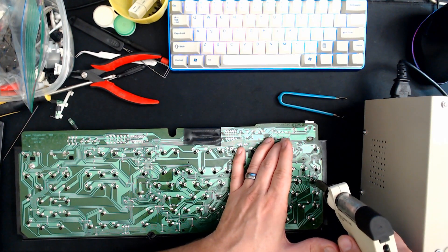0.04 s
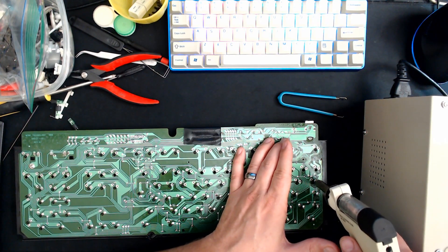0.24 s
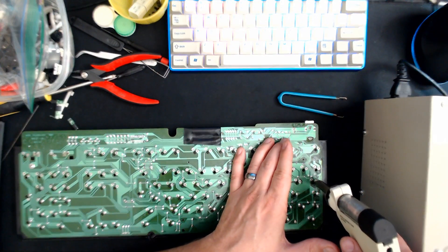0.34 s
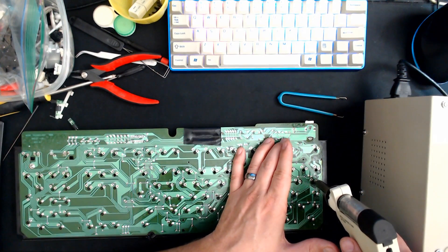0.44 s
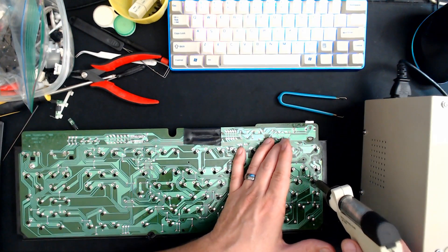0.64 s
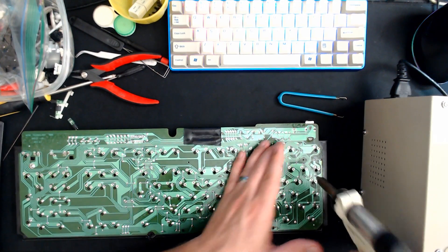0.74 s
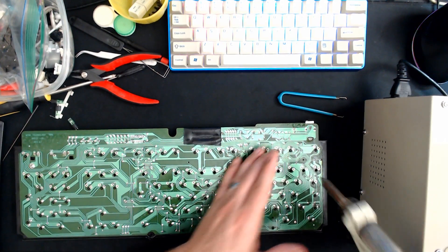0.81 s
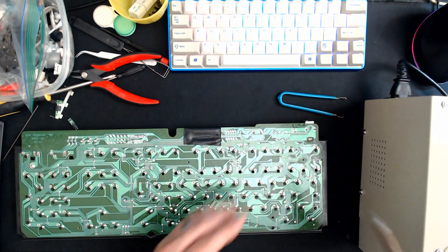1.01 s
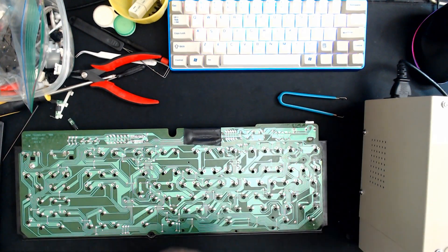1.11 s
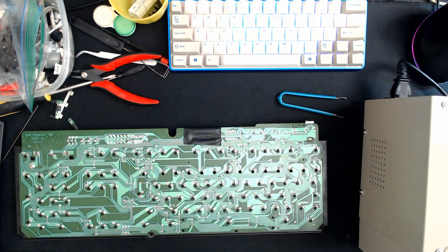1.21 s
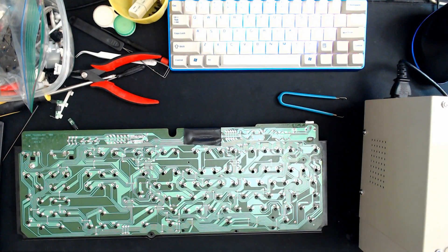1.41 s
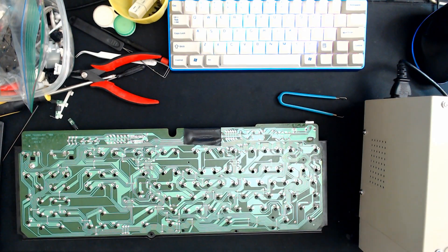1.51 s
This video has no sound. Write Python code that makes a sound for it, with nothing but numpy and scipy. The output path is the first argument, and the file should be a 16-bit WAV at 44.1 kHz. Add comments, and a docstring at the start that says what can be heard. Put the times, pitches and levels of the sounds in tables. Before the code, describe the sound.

A desoldering gun's small vacuum pump buzzes in one short burst, then a fan hums quietly

```python
"""Workbench in a small room: a fan hums throughout. A desoldering gun's trigger clicks and its diaphragm
vacuum pump spins up, runs under half a second and judders to a stop. One shaft phase drives throb partials,
motor whine, casing knocks and pulsed air; solder spits and whistles are noise bursts and rough glides.
Hands then brush off the circuit board, which settles as a few damped modes."""
import sys
import numpy as np
from scipy import signal
from scipy.fft import rfft, irfft, next_fast_len
from scipy.io import wavfile
from scipy.ndimage import map_coordinates

SR = 44100
rng = np.random.default_rng(int(sys.argv[2]) if len(sys.argv) > 2 else 0)


def master_out(mix):
    """Clip the mix to full scale and print it as 16-bit PCM to the path in sys.argv[1]."""
    frames = np.transpose(np.atleast_2d(mix))
    ceiling = np.clip(frames, -1, 1)
    pcm = np.round(ceiling * 32767).astype(np.int16)
    wavfile.write(sys.argv[1], SR, pcm)


N = 68355

# pump shaft: t/s, speed/(turns/s)
SHAFT_SPEED = [(.186, 30), (.2, 46), (.22, 57), (.255, 69), (.335, 78.2), (.4, 80.7), (.48, 82.3),
               (.575, 82.8), (.6, 66), (.645, 35)]
# drive to the casing, for knocks and whine: t/s, level/dB
CASING_DRIVE = [(.175, -110), (.195, -50), (.215, -43), (.245, -38.5), (.29, -42), (.42, -40.5), (.56, -42),
                (.605, -40), (.635, -48.5), (.66, -110)]
# casing resonances: f/Hz, width/Hz, level/dB
CASING_MODES = [(424, 99, -18.5), (634, 38, -12.5), (761.5, 74, -10), (812.6, 28.6, -1), (988, 58.5, 1),
                (1071, 76, -3.5), (1391, 32, -11), (1721, 10, -11.5), (1931.7, 29.4, 0), (2190, 210, -16),
                (2488, 53, -11), (3030, 27, -54), (3550, 65, -54), (3820, 33, -18)]
TOP_HZ = 15800
THROB_ROOM_DB = -17.5
ROOM_DB = -10


def amp(db):
    """Decibels to gain."""
    return 10 ** (np.asarray(db) / 20)


def unit(x):
    """Scale to rms 1."""
    return x / np.sqrt(np.mean(x ** 2) + 1e-20)


def clock():
    """Time of every sample, s."""
    return np.arange(N) / SR


def level(rows):
    """Gain from (t/s, level/dB) points."""
    return amp(np.interp(clock(), *np.transpose(rows)))


def wobble(knots_per_s):
    """Smooth random curve; repeats after 400 knots."""
    return map_coordinates(rng.standard_normal(400), [clock() * knots_per_s], mode="wrap")


def filtered(x, response):
    """x times a response of frequency."""
    m = next_fast_len(N + SR // 2)
    return irfft(rfft(x, m) * response(np.fft.rfftfreq(m, 1 / SR)), m)[:N]


def coloured(x, points):
    """x shaped by (f/Hz, level/dB) points on a log axis."""
    hz, db = np.transpose(points)
    return filtered(x, lambda f: amp(np.interp(np.log(f + 1), np.log(hz), db)))


def gain(body, f):
    """Complex response of a body: a sum of resonances of alternating sign."""
    total = 0
    for k, (centre, width, db) in enumerate(body):
        band = 1j * f * width
        total = total + (-1) ** k * amp(db) * band / (centre * centre - f * f + band)
    return total


def resonate(x, body):
    """x through a body's resonances."""
    return filtered(x, lambda f: gain(body, f))


def fade(start_s, t60_s):
    """Exponential decay from a start time, zero before it."""
    age = clock() - start_s
    return (age >= 0) * np.exp(-np.log(1000) * np.abs(age) / t60_s)


def ring(start_s, modes, scatter_db, attack_s):
    """Struck damped modes; a softer contact has a longer attack time constant."""
    onset = 1 - fade(start_s, np.log(1000) * attack_s)
    total = np.zeros(N)
    for hz, db, t60_s in modes:
        size = amp(db + scatter_db * rng.normal())
        total += size * fade(start_s, t60_s) * np.sin(2 * np.pi * hz * (clock() - start_s))
    return onset * total


def fan():
    """Two hum lines that swell and fade, weaker wavering lines, resonant moving air and room tone."""
    # hum lines: t/s, level/dB rms
    hum_low = [(0, -80), (.08, -84), (.15, -54.5), (.65, -63), (.8, -60.5), (.91, -71), (1.03, -57),
               (1.11, -69), (1.155, -49), (1.2, -69), (1.29, -52), (1.36, -56), (1.55, -56.5)]
    hum_high = [(0, -60.5), (.15, -58.5), (.6, -69), (.9, -65.5), (1.22, -70), (1.35, -63.5), (1.55, -59.5)]
    hum_low_hz, hum_high_hz = 317.2, 365.4
    # weaker lines: f/Hz, mid level/dB rms
    fan_lines = [(100, -79), (270, -75), (414.5, -77), (527.6, -83.5), (1104, -84.5), (1416, -79.5),
                 (2035, -79.5)]
    waver_db, wander_rad = 2.5, .3
    # air resonances: f/Hz, width/Hz, level/dB
    duct = [(271, 77, 0), (1900, 350, -20), (3964, 53, -16.5)]
    # room tone spectrum: f/Hz, level/dB
    room_tone = [(12, -34), (20, -30), (45, -5.5), (70, -30), (101, -16), (187, -57), (233, -10.5),
                 (284, -6), (317, -4), (397, -21.5), (524, -24), (570, -27), (1080, -24.5), (1560, -28.5),
                 (2060, -23), (2500, -33.5), (15800, -56)]
    duct_db, room_tone_db = -67, -59.5

    def tone(hz):
        phase = 2 * np.pi * (hz * clock() + rng.random())
        return np.sqrt(2) * np.sin(phase + wander_rad * wobble(12.45))

    hum = level(hum_low) * tone(hum_low_hz) + level(hum_high) * tone(hum_high_hz)
    lines = sum(amp(db + waver_db * wobble(14.26)) * tone(hz) for hz, db in fan_lines)
    air = amp(duct_db) * unit(resonate(rng.standard_normal(N), duct))
    return hum + lines + air + amp(room_tone_db) * unit(coloured(rng.standard_normal(N), room_tone))


def clicks():
    """Trigger, solder and board clicks: tilted noise cracks; the trigger also rings the gun."""
    # cracks: t/s, level/dB, tilt/(dB/octave)
    cracks = [(.1667, -37, -2), (0.446, -37, -8.5), (0.489, -41.5, -0.5), (0.5749, -33, -5.5),
              (0.584, -38, -13), (.605, -37, -10), (0.628, -37.5, -4), (.641, -42, -17), (.69, -52.5, -7),
              (0.862, -53.5, -4)]
    # gun modes: f/Hz, level/dB, t60/s
    gun = [(4320, -2, 0.021), (4940, -3, 0.012), (7150, 0, 0.02), (10760, -2, 0.014), (13420, -4, .02)]
    trigger_s, trigger_db = .1667, -47
    crack_t60_s, low_hz = 0.0098, 2220
    out = amp(trigger_db) * ring(trigger_s, gun, scatter_db=2.5, attack_s=0.00018)
    for s, db, tilt in cracks:
        envelope = fade(s, crack_t60_s) - fade(s, crack_t60_s / 10)
        crack = envelope * rng.standard_normal(N)

        def colour(f):
            highpass = f ** 4 / (f ** 4 + low_hz ** 4)
            return amp(tilt * np.log2((f + 500) / 6000)) * highpass

        out += amp(db) * filtered(crack, colour)
    return out


def slurps():
    """Molten solder whistles briefly in glides roughened by random phase."""
    # glides: t/s, length/s, from f/Hz, to f/Hz, level/dB
    glides = [(.543, 0.024, 20000, 4300, -53.5), (0.25, 0.02, 3000, 6200, -54),
              (0.18, 0.0118, 6300, 9500, -67)]
    roughness_rad = 1.15
    out = np.zeros(N)
    for s, length_s, from_hz, to_hz, db in glides:
        u = np.clip((clock() - s) / length_s, 0, 1)
        phase = 2 * np.pi * np.cumsum(from_hz + (to_hz - from_hz) * u) / SR
        swell = np.sqrt(np.abs(2 * np.sin(np.pi * u)))
        out += amp(db) * swell * np.sin(phase + roughness_rad * wobble(2500))
    return out


def throb(turns):
    """The diaphragm's low partials, locked to the shaft, grow as the vacuum builds."""
    # envelope: t/s, level/dB
    swell = [(.17, -110), (.19, -59), (.215, -47.5), (.27, -45.5), (.31, -40), (.42, -37.5), (.5, -36),
             (.575, -35.5), (.6, -48.5), (.625, -65), (.67, -110)]
    # partials: multiple of shaft speed, level/dB
    orders = [(1, -34), (2, -6), (3, -0.5), (4, -13), (5, -24.5), (6, -65), (7, -17.5)]
    partials = sum(amp(db) * np.sin(2 * np.pi * k * turns) for k, db in orders)
    return np.sqrt(2) * level(swell) * partials


def knocking(turns):
    """Two strokes a turn, loose rattle and a few start and stall judders ring the casing."""
    # judders: t/s, level/dB
    judder_rows = [(.189, -39.5), (.201, -39.5), (.21, -46), (.608, -39.5), (.625, -30), (.633, -35.5)]
    judder_soft_hz = 1530
    return_turns, return_db = .5, -2.5
    jitter_s, scatter_db = .00005, 0.6
    knock_db, rattle_db, rattle_depth = -5, -6.5, 0.78
    strokes = np.zeros(N)
    for offset_turns, db in [(0, 0), (return_turns, return_db)]:
        s = np.interp(np.arange(1, int(turns[-1])) + offset_turns, turns, clock())
        late, size = rng.standard_normal((len(s), 2)).T
        at = np.clip(np.round((s + jitter_s * late) * SR).astype(int), 0, N - 1)
        np.add.at(strokes, at, amp(db + scatter_db * size))
    strokes = strokes * np.sqrt(SR / np.max(SHAFT_SPEED))
    # rattle peaks twice a turn
    rattle = rng.standard_normal(N) * (1 + rattle_depth * np.cos(4 * np.pi * turns))
    answer = resonate(signal.unit_impulse(N), CASING_MODES)
    drive = level(CASING_DRIVE) * (amp(knock_db) * strokes + amp(rattle_db) * rattle)
    drive = drive / np.linalg.norm(answer)
    judders = sum(amp(db) * signal.unit_impulse(N, round(s * SR)) for s, db in judder_rows)
    judders = judders / np.abs(answer).max()
    soft = filtered(judders, lambda f: np.sqrt(2) / (1 + (f / judder_soft_hz) ** 2))
    return resonate(drive + soft, CASING_MODES)


def whine(turns):
    """Motor partials light up as they climb through the casing's resonances."""
    # partials: multiple of shaft speed, mid level/dB
    partials = [(6, -4.5), (7, -0.5), (9, -5.5), (10, -7.5), (11, -12), (12, -8.5), (13, -18.5), (17, -9),
                (21, -5), (23, -7), (24, -12)]
    whine_db, waver_db, wander_rad = 9, 1.2, 0.16
    lines = np.zeros(N)
    for k, db in partials:
        size = amp(db + waver_db * wobble(22))
        phase = 2 * np.pi * (k * turns + rng.random())
        lines += size * np.sin(phase + wander_rad * wobble(41.6))
    return resonate(amp(whine_db) * level(CASING_DRIVE) * lines, CASING_MODES)


def suction(turns):
    """Air hiss pulsing once a turn through the nozzle, with tiny random spits of solder."""
    # envelope: t/s, level/dB
    rush = [(.15, -110), (.2, -67), (.225, -54), (.27, -51), (.34, -52), (.58, -52.5), (.63, -57),
            (.665, -64.5), (.71, -78), (.78, -115)]
    # spectrum of hiss and spits: f/Hz, level/dB
    spectrum = [(100, 7.5), (300, 17), (1200, 13), (2500, 11.5), (4000, 5), (5000, 2.5), (6700, -1),
                (8200, 3), (8700, 1), (9080, 4.5), (9600, -2.5), (11500, -4.5), (13800, -4.5),
                (14500, -0.5), (15800, -9)]
    hiss_db, hiss_depth = 4, 0.2
    spits_per_s, spit_db, spit_spread_db = 400, -5.5, 3
    pulse = 1 + hiss_depth * np.cos(2 * np.pi * turns)
    hiss = unit(coloured(rng.standard_normal(N), spectrum)) * pulse
    hits = (rng.random(N) < spits_per_s / SR) * rng.choice([-1, 1], N)
    spits = hits * amp(spit_spread_db * rng.standard_normal(N))
    return level(rush) * (amp(hiss_db) * hiss + amp(spit_db) * unit(coloured(spits, spectrum)))


def rocking():
    """Starting and stopping rock the pump on its rubber feet: low damped modes."""
    # rocks: t/s, level/dB
    rocks = [(0.197, -49.5), (.59, -50.5)]
    # feet modes: f/Hz, level/dB, t60/s
    feet = [(42.3, -1.5, 0.67), (66, 3.5, 0.21), (107.2, 6, 0.13)]
    return sum(amp(db) * ring(s, feet, scatter_db=2.5, attack_s=0.011) for s, db in rocks)


def handling():
    """A hand brushes off the circuit board (grainy noise), which settles on the mat with a soft bump."""
    # brush strokes: t/s, level/dB
    brushes = [(.934, -65), (.956, -62)]
    # brush spectrum: f/Hz, level/dB
    slide = [(300, -7), (1400, 2.5), (2400, -1), (4200, -8), (6000, -16.5), (15000, -28)]
    # board modes: f/Hz, mid level/dB, t60/s
    board = [(330, -55, .05), (520, -52.5, .13), (590, -56, .07), (665, -56, .06)]
    brush_width_s, grain_db, board_s = .007, 5, 1.0675
    strokes = sum(amp(db) * np.exp(-.5 * ((clock() - s) / brush_width_s) ** 2) for s, db in brushes)
    grains = rng.standard_normal(N) * amp(grain_db * wobble(500))
    bump = ring(board_s, board, scatter_db=4.5, attack_s=.001)
    return strokes * unit(coloured(grains, slide)) + bump


def room(x, db):
    """Adds the short noise tail of a small workroom; its treble dies first."""
    t60_s, treble_t60_s, cross_hz = 0.3, 0.095, 2520
    noise = rng.standard_normal(N)
    bass = filtered(noise, lambda f: 1 / (1 + (f / cross_hz) ** 2))
    tail = bass * fade(0.0047, t60_s) + (noise - bass) * fade(0.0015, treble_t60_s)
    return x + amp(db) * signal.fftconvolve(x, tail / np.linalg.norm(tail))[:N]


def scene():
    """One shaft drives throb, whine, knocks and suction; the other sounds are added."""
    speed = np.interp(clock(), *np.transpose(SHAFT_SPEED), left=0, right=0)
    turns = np.cumsum(speed) / SR
    near = room(knocking(turns) + suction(turns) + slurps() + clicks() + handling(), ROOM_DB)
    pump = room(throb(turns), THROB_ROOM_DB) + whine(turns) + rocking()
    return (near + pump + fan())[None]


def record(dry):
    """Band limit: nothing passes at or above TOP_HZ."""
    return np.array([filtered(x, lambda f: f < TOP_HZ) for x in dry])


dry = scene()
out = record(dry)
master_out(out)
```